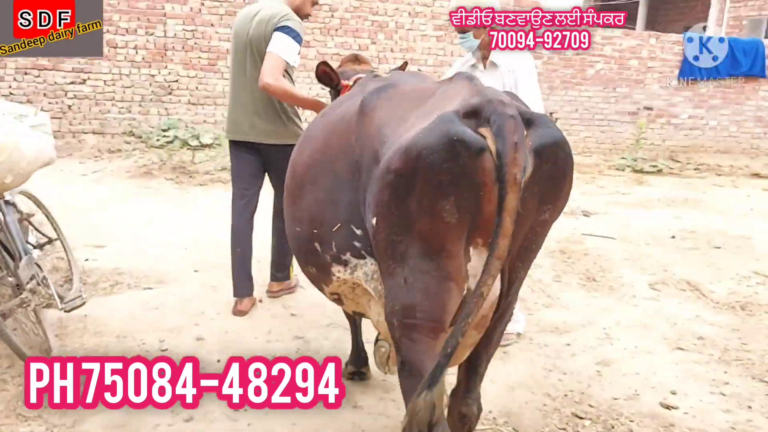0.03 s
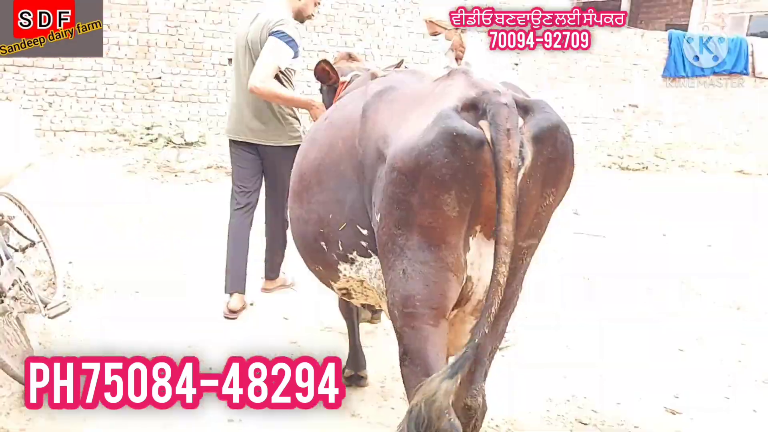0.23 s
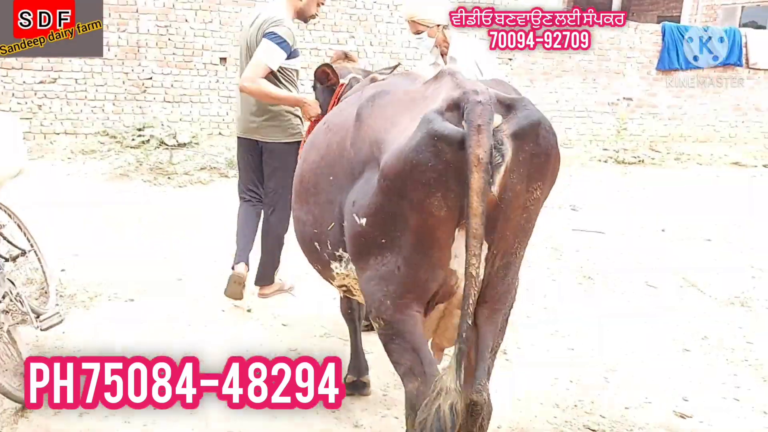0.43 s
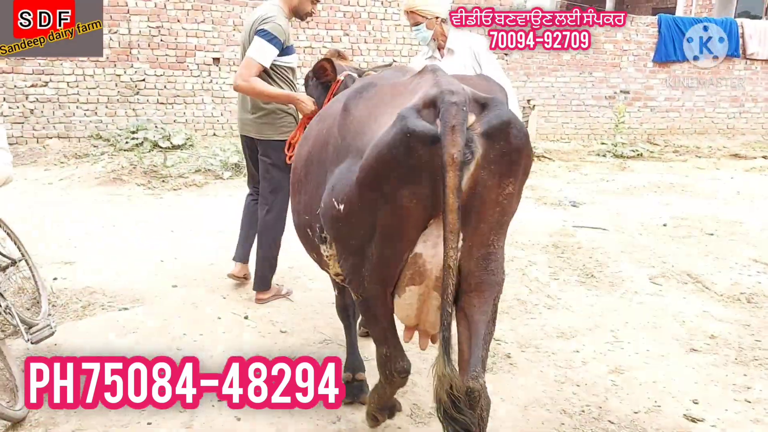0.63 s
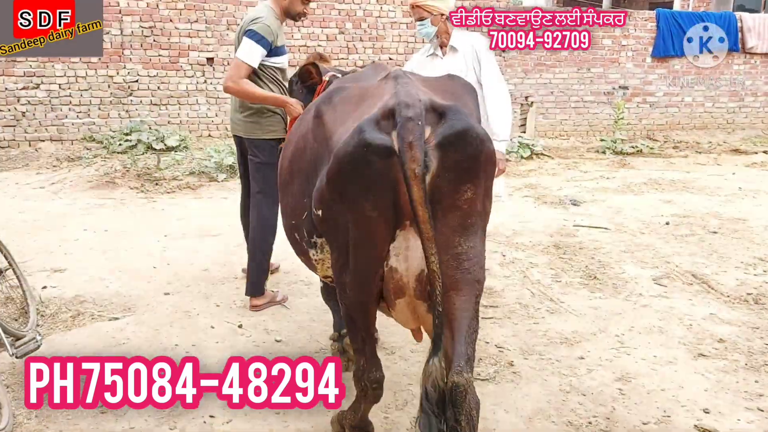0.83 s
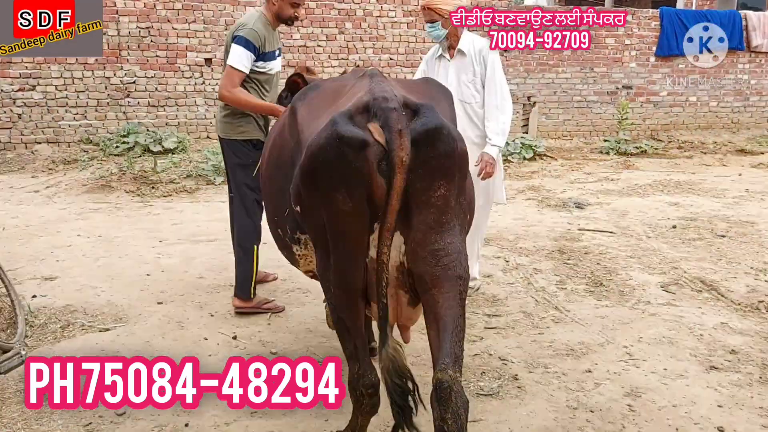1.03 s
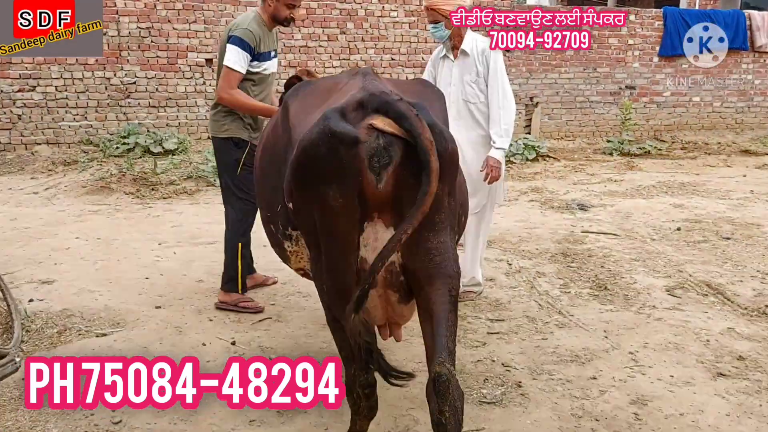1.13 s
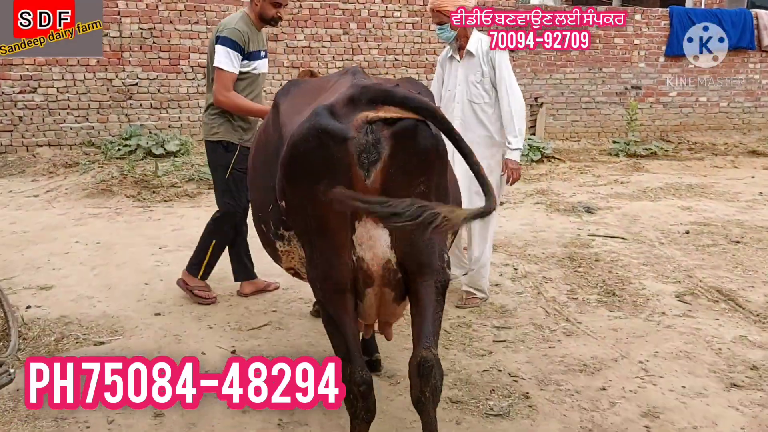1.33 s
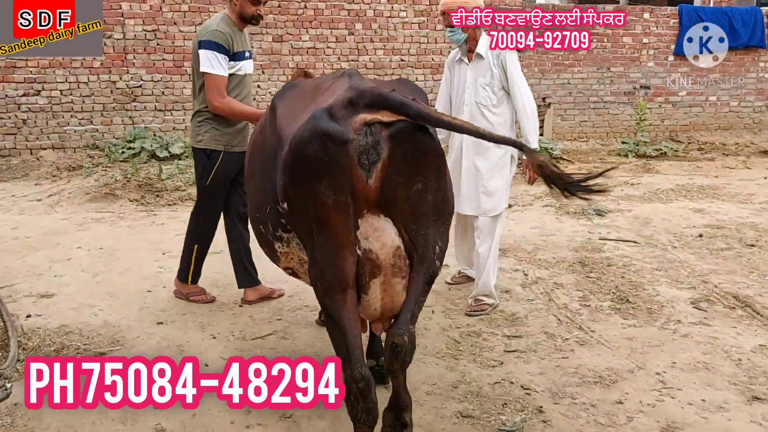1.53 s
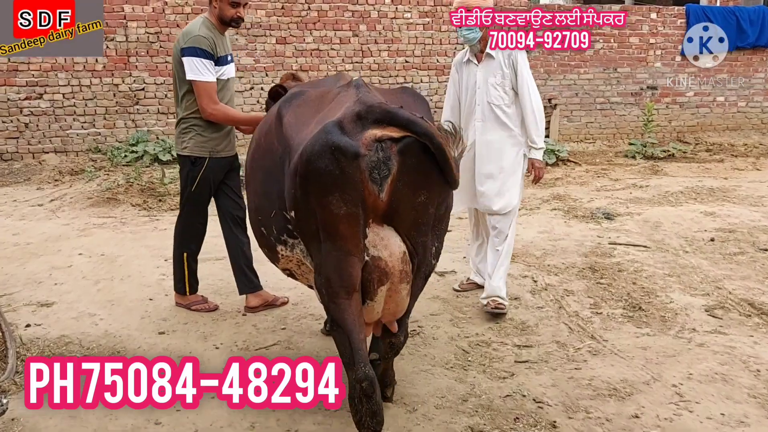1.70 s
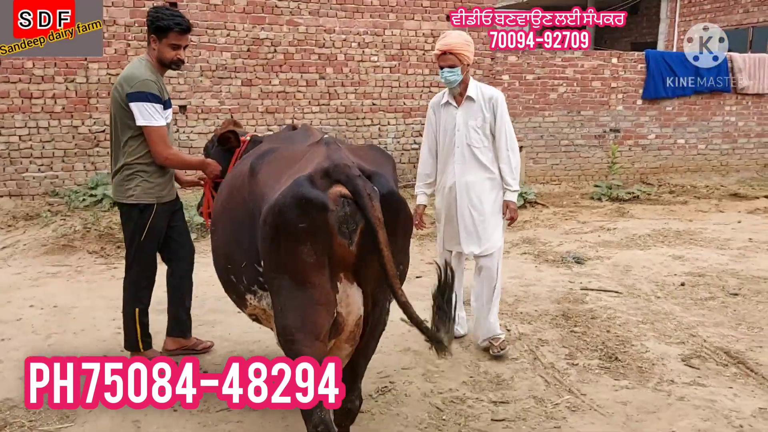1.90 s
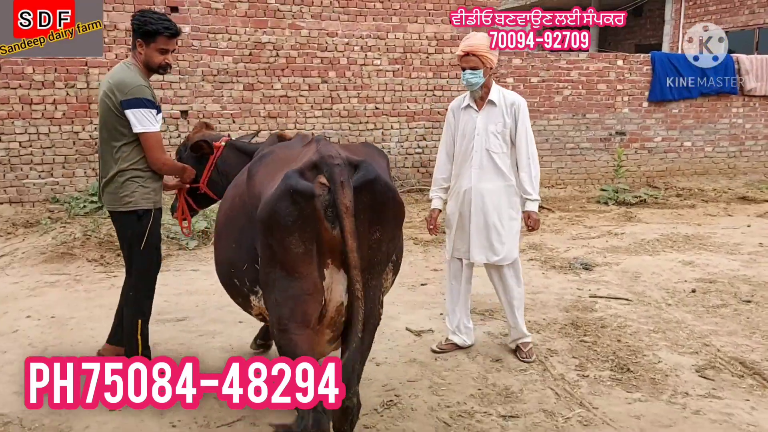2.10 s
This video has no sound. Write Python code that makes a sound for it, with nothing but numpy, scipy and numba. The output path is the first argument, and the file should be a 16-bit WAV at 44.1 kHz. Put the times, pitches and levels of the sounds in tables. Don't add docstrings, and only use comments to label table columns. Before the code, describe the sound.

One long low moo from a cow in a brick-walled earth yard, heard from a few metres: light knocks, muffled grunt, rising hum, loud bellow, a hard knock near the end, hoarse breath and a last foot scuff.

```python
import sys
import numpy as np
from scipy import signal
from scipy.fft import rfft, irfft
from scipy.io import wavfile
from scipy.ndimage import uniform_filter1d
from numba import njit

SR = 44100
rng = np.random.default_rng(int(sys.argv[2]) if len(sys.argv) > 2 else 0)


def unload_audio(sound):
    columns = np.transpose(np.atleast_2d(sound))
    steps = np.round(np.clip(columns, -1, 1) * 32767)
    wavfile.write(sys.argv[1], SR, steps.astype(np.int16))


def level_to_linear(level):
    exponent = np.asarray(level, float) / 20
    return 10 ** exponent


N = 95079
T = np.arange(N) / SR

# f/Hz, level per Hz/dB
HUSH_COLOUR = [(18, -50), (30, -5.5), (173, -1), (315, -9), (500, -6.5), (874, -15.5), (2200, -21.5),
               (4500, -30), (15500, -32)]
# f/Hz, level per Hz/dB
DUST_COLOUR = [(800, -18.5), (3000, 4), (5950, -6), (6530, -5), (8000, -13.5), (10700, -7), (13500, -10),
               (15500, -17)]
# f/Hz, level per Hz/dB
SCRAPE_COLOUR = [(200, -13), (800, -0.5), (1300, -8), (1900, 1.5), (3000, -11), (5000, -60)]
# t/s, length/s, hiss level/dB, scrape level/dB
SCUFFS = [
    (-.05, 0.09, -61, -57.5),
    (0.172, 0.078, -67, -73),
    (0.629, 0.33, -71, -56.5),
    (0.961, 0.14, -54.5, -45),
    (1.087, 0.058, -50.5, -44),
    (1.148, 0.11, -52, -46),
    (1.244, 0.079, -59, -83),
    (1.392, 0.1, -62.5, -92),
    (1.66, 0.14, -67, -77),
    (2.124, 0.086, -52.5, -51),
]
# t/s, peak level/dB, ring f/Hz
KNOCKS = [(0.086, -47.5, 785), (.148, -48.5, 600), (0.192, -42.5, 465), (.218, -65, 714), (0.24, -52, 267),
          (0.285, -47, 387), (.379, -46.5, 520), (.415, -62, 600), (.429, -43, 473), (0.487, -52.5, 1000),
          (.541, -71, 444), (.594, -52, 286), (1.808, -22.5, 2000)]
# t/s, peak level/dB
GRIT_TICKS = [
    (1.7759, -41),
    (1.8133, -49),
    (2.0605, -51),
]
# t/s, f/Hz
GRUNT_PITCH = [(.5, 126), (.62, 136.1), (.73, 126.9), (.765, 95)]
# t/s, f/Hz
CALL_PITCH = [(0.78, 96.45), (0.93, 111.9), (1.056, 120.9), (1.102, 122.3), (1.422, 122.4), (1.658, 119),
              (1.754, 115.6), (1.868, 108.8), (1.94, 102.9)]
# t/s, f/Hz
SIGH_PITCH = [(1.963, 100.5), (1.99, 107.6), (2.058, 102.6), (2.112, 96.6), (2.15, 94)]
# t/s, roughness/0-1
ROUGHNESS = [(.5, .7), (.74, .65), (.8, .1), (1.0, .04), (1.08, .025), (1.66, .03), (1.78, .08), (1.9, .16),
             (1.96, .7), (2.05, .9), (2.1, .35)]
# t/s, fundamental level/dB, octave level against it/dB
CHEST_HUM = [(.5, -67, -20), (.585, -54.5, -24), (.63, -48, -2), (.71, -51, 1.5), (.76, -51, -2),
             (.8, -42, -5), (.9, -37, -13.5), (.95, -34, -7.5), (1.01, -55.5, 17), (1.07, -45, 0),
             (1.2, -50, 6), (1.72, -50, 8), (1.9, -34.5, -15), (2.0, -47, 0.5), (2.06, -45, -9.5),
             (2.09, -49, -6), (2.115, -44, -16), (2.15, -42, -20)]
# t/s, level/dB
NOSE_LEVEL = [(.56, -78), (.64, -52.5), (.71, -46.5), (.77, -36), (.84, -31.5), (.93, -33.5), (1.03, -37.5),
              (1.1, -33.5), (1.3, -92)]
# f at the grunt/Hz, f at the hum/Hz, width/Hz, level/dB
NASAL_RINGS = [(517, 450, 250, -12), (630, 716, 280, -8.5), (1102, 930, 90, -2), (1195, 1410, 200, -3),
               (1950, 1837, 150, 7.5), (2290, 2030, 92, 7), (2710, 2200, 80, 2), (2820, 2100, 38, -4),
               (3440, 3130, 99, -5.5), (4300, 3500, 160, -12.5), (5170, 6200, 200, -15)]
NOSE_SINK_S = (0.74, 0.896)
# t/s, level/dB, jaw opening/0-1.2
MOUTH = [(.95, -63, .6), (1.02, -53, 0.6), (1.05, -30, 0.97), (1.11, -25.5, 1.15), (1.25, -23, 0.98),
         (1.47, -21, 0.8), (1.62, -24, 0.51), (1.86, -25.5, 0.5), (2.02, -29.5, 0), (2.07, -43, 0.03),
         (2.13, -49, 0.36)]
# f jaw low/Hz, f jaw wide/Hz, width/Hz, level jaw low/dB, level jaw wide/dB
THROAT_RINGS = [(427.2, 477, 64.6, -1.5, -4), (660, 638, 69, -6, -22), (900, 856, 55.3, -8.5, 0),
                (1266, 1229, 93, -23.5, -11), (1420, 1465, 74, -0.5, 4.5), (1756, 1690, 98, -2, 3),
                (2090, 1960, 118, -16.5, -2), (2440, 2360, 270, -22, -13), (2824, 2812, 80, -7.5, -1),
                (3040, 3060, 93, -33, -6.5), (3370, 3300, 70, -14, -12.5), (3631, 3590, 74, -16, -12.5),
                (4230, 4110, 190, -20, -29.5)]
# delay left/ms, delay right/ms, level left/dB, level right/dB
ECHOES = [
    (0.823, 1.239, -13.5, -11.5),
    (7.46, 7.3, -15, -12),
    (12.02, 11.9, -26, -13),
    (20.52, 20.3, -20.5, -12.5),
    (30.2, 29.4, -14, -13.5),
    (43.17, 42.9, -9, -23.5),
]

HUSH_DB, SWELL_DB, FLICKER_DB = -56, .8, 1.5
KNOCK_T60_S, KNOCK_RISE_S, KNOCK_TICK_DB = .03, .0008, -1
SCUFF_RISE_S = 0.017
GRIT_SLOW_DB, GRIT_QUICK_DB = 1.2, 2
JITTER, SHIMMER_DB, DOUBLING, BREATH_DB = .05, 4, .9, 1.5
FOLD_TILT_DB, FOLD_TOP_PARTIAL = -3, 31
SPREAD_TURNS = .011
WARBLE_TURNS, GROWL_DB = .07, 6
NOSE_HISS_DB, AIR_DB = -9, -35
PORT_LAG_MS, PAN_DB = .24, -2
TAIL_T60_S, TAIL_DB, TAIL_HZ = .3, -18, 2500
LOW_CUT_HZ, TOP_HZ = 32, 15800
MASK_DB, MASK_SCATTER_DB, MASK_FROM_HZ = -53.5, 8, 4500


def level(x, db):
    return x * level_to_linear(db) / np.sqrt(np.mean(x ** 2))


def curve(rows, column=1):
    rows = np.array(rows, float)
    return np.interp(T, rows[:, 0], rows[:, column])


@njit
def svf(x, hz, width):
    y, b, l = np.empty(len(x)), 0., 0.
    for i in range(len(x)):
        g, k = np.tan(np.pi * hz[i] / SR), width / hz[i]
        v = (b + g * (x[i] - l)) / (1 + g * (g + k))
        b, l, y[i] = 2 * v - b, l + 2 * g * v, k * v
    return y


def ring(x, hz, width):
    hz = np.zeros(N) + hz
    return svf(svf(x, hz, 1.81 * width), hz, 1.81 * width)


def walk(rate):
    hold = int(SR / rate)
    steps = np.repeat(rng.standard_normal(N // 50)[:N // hold + 1], hold)
    return 1.393 * uniform_filter1d(uniform_filter1d(steps, hold), hold)[:N]


def coloured(points):
    hz, p = np.fft.rfftfreq(N, 1 / SR) + 1, np.array(points, float)
    gain = level_to_linear(np.interp(np.log(hz), np.log(p[:, 0]), p[:, 1]))
    return level(irfft(rfft(rng.standard_normal(N)) * gain, N), 0)


def late(x, ms):
    return np.interp(T - ms / 1000, T, x, left=0)


def yard():
    mid, left, right = (coloured(HUSH_COLOUR) for _ in range(3))
    high_pass = signal.butter(1, 400, "high", fs=SR, output="sos")
    apart = signal.sosfilt(high_pass, np.array([left, right]) - mid)
    return level(mid + apart, HUSH_DB) * level_to_linear(SWELL_DB * walk(7.4) + FLICKER_DB * walk(23.5))


def scuffs():
    hiss, scrape = np.zeros((2, N))
    for s, length, hiss_db, scrape_db in SCUFFS:
        stroke = np.clip(np.minimum((T - s) / SCUFF_RISE_S, (s + length - T) / 0.055 + .5), 0, 1)
        hiss += level_to_linear(hiss_db) * stroke
        scrape += level_to_linear(scrape_db) * stroke
    dust = np.array([hiss * coloured(DUST_COLOUR) + scrape * coloured(SCRAPE_COLOUR) for _ in range(3)])
    grain = level_to_linear(GRIT_QUICK_DB * walk(60) + GRIT_SLOW_DB * walk(20.16))
    return grain * (0.66 * dust[0] + 1.61 * dust[1:])


def knocks():
    out = np.zeros(N)
    contact = ring(rng.standard_normal(N), 1410, 940) * 4
    grit = rng.standard_normal(N)
    for s, db, hz in KNOCKS:
        age = np.clip(T - s, 0, None)
        fade = level_to_linear(db - 60 * age / KNOCK_T60_S) * np.minimum(age / KNOCK_RISE_S, 1)
        thud = np.sin(2 * np.pi * hz * age) + 0.34 * np.sin(2 * np.pi * 0.44 * hz * age)
        out += fade * (thud + level_to_linear(KNOCK_TICK_DB) * contact)
    for s, db in GRIT_TICKS:
        out += (T > s) * level_to_linear(db - 60 * np.clip(T - s, 0, None) / 0.014) * grit
    return out


def folds():
    rough, pitch = curve(ROUGHNESS), curve(GRUNT_PITCH + list(CALL_PITCH) + SIGH_PITCH)
    turns = np.cumsum(pitch * (1 + JITTER * rough * walk(90))) / SR
    shimmer = rng.standard_normal(N // 100)[turns.astype(int)]
    size = uniform_filter1d(level_to_linear(SHIMMER_DB * rough * shimmer), 60)
    size = size * (1 + DOUBLING * rough ** 2 * np.cos(np.pi * turns))
    k = np.arange(1, 46)[:, None]
    tilt = level_to_linear(FOLD_TILT_DB * np.log2(k) - np.clip(k - FOLD_TOP_PARTIAL, 0, None))
    partials = tilt * np.cos(2 * np.pi * k * (turns - SPREAD_TURNS * k))
    pulses = level(partials.sum(axis=0), 0)
    puff = 1 + .5 * np.cos(2 * np.pi * (turns + 0.41))
    breath = level(ring(rng.standard_normal(N), 2230, 4100) * puff, 0)
    smooth_turns = uniform_filter1d(turns, size=250) + WARBLE_TURNS * rough * walk(40)
    swing = np.sqrt(2) * np.cos(2 * np.pi * k[:2] * smooth_turns)
    source = size * (pulses * (1 - .5 * rough) + level_to_linear(BREATH_DB) * breath * rough)
    return source, breath, swing * size


def chest(swing):
    growl = level_to_linear(1.8 * walk(13.99) + GROWL_DB * curve(ROUGHNESS) * np.tanh(walk(44.48)))
    return (swing[0] + level_to_linear(curve(CHEST_HUM, column=2)) * swing[1]) * growl * level_to_linear(curve(CHEST_HUM))


def nose(source, breath):
    snort = source + level_to_linear(NOSE_HISS_DB) * breath
    rings = sum(level_to_linear(db) * ring(snort, np.interp(T, NOSE_SINK_S, (f0, f1)), w) for f0, f1, w, db in NASAL_RINGS)
    return level(rings, 0) * level_to_linear(curve(NOSE_LEVEL))


def mouth(source):
    jaw = np.clip(curve(MOUTH, column=2), 0, 1.2)
    rings = 0
    for k, (f0, f1, w, d0, d1) in enumerate(THROAT_RINGS):
        gain = level_to_linear(d0 + (d1 - d0) * jaw + walk(6.94))
        rings = rings + (-1) ** k * gain * ring(source, f0 + (f1 - f0) * jaw, w)
    air = coloured(DUST_COLOUR) * level_to_linear(AIR_DB + 5.8 * walk(44.04))
    return (level(rings, 0) + air) * level_to_linear(curve(MOUTH)) * (T > MOUTH[0][0])


def cow():
    source, breath, swing = folds()
    start = np.clip((T - CHEST_HUM[0][0]) / 0.12, 0, 1)
    return chest(swing) * start, nose(source, breath) * start + mouth(source)


def tail(x):
    age = T[:SR // 2]
    scatter = rng.standard_normal((3, len(age))) * level_to_linear(-60 * age / TAIL_T60_S) * np.minimum(age / 0.022, 1)
    scatter = 0.7 * scatter[0] + 0.17 * scatter[1:]
    scatter = signal.lfilter(*signal.butter(1, TAIL_HZ, fs=SR), scatter)
    scatter = scatter * level_to_linear(TAIL_DB) / np.sqrt((scatter ** 2).sum(axis=1, keepdims=True))
    return signal.fftconvolve(x[None], scatter, axes=1)[:, :N]


def scene():
    hush, drag, knock = yard(), scuffs(), knocks()
    hum, call = cow()
    near = call + knock
    out = np.array([late(near, PORT_LAG_MS) * level_to_linear(PAN_DB / 2), near * level_to_linear(-PAN_DB / 2)])
    for ms_l, ms_r, db_l, db_r in ECHOES:
        out += np.array([late(call, ms_l) * level_to_linear(db_l), late(call, ms_r) * level_to_linear(db_r)])
    out += hum + level_to_linear(-10.5) * np.array([late(hum, 23.2), late(hum, 25.03)])
    return out + tail(near + 0.92 * hum) + drag + hush


def masked(x):
    hz, _, z = signal.stft(x, SR, nperseg=2048)
    power = (abs(z) ** 2).sum(axis=0)
    band = uniform_filter1d(power, size=16, axis=0)[::16] * 24
    scatter = uniform_filter1d(rng.standard_normal(band.shape), size=2, axis=1) * MASK_SCATTER_DB
    keep = band > power.sum(axis=0) * level_to_linear(2 * (MASK_DB + scatter))
    keep = np.repeat(keep, repeats=16, axis=0)[:len(hz)] | (hz < MASK_FROM_HZ)[:, None]
    return signal.istft(z * keep * (hz < TOP_HZ)[:, None], SR, nperseg=2048)[1][:, :N]


def top_cut(x):
    return signal.sosfilt(signal.butter(12, 16070, fs=SR, output="sos"), x)


def record(dry):
    thinned = signal.lfilter(*signal.butter(1, LOW_CUT_HZ, "high", fs=SR), dry)
    return top_cut(masked(thinned))


dry = scene()
out = record(dry)
unload_audio(out)
```